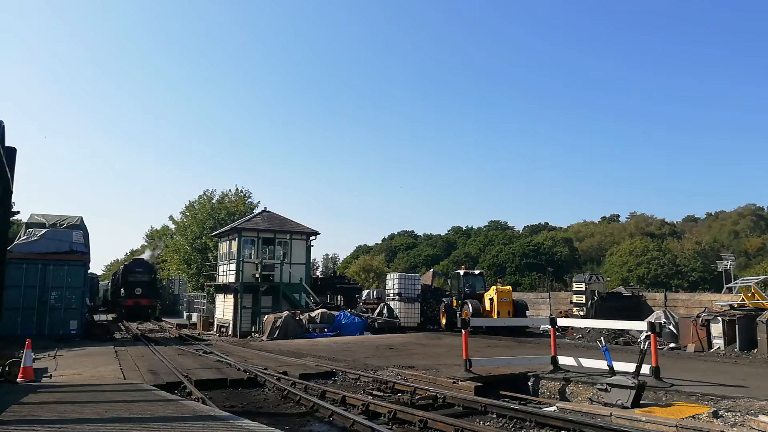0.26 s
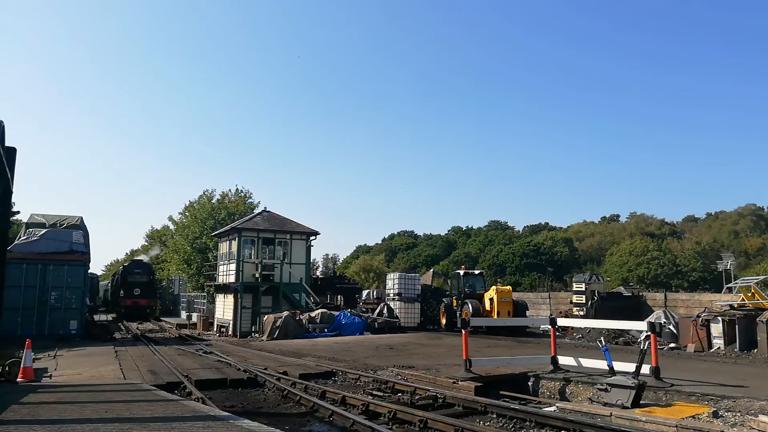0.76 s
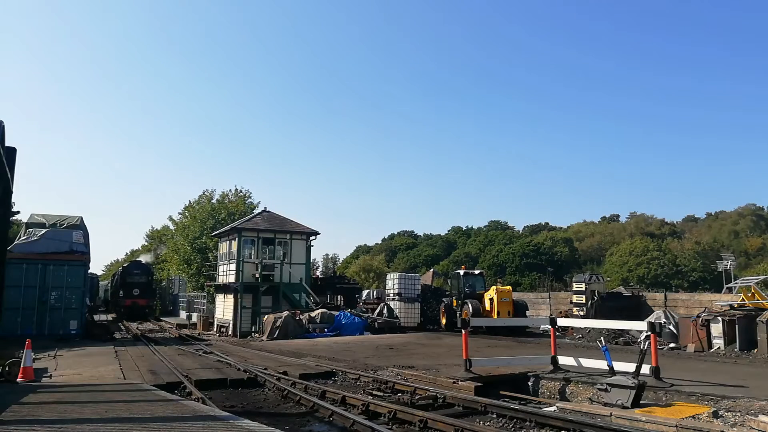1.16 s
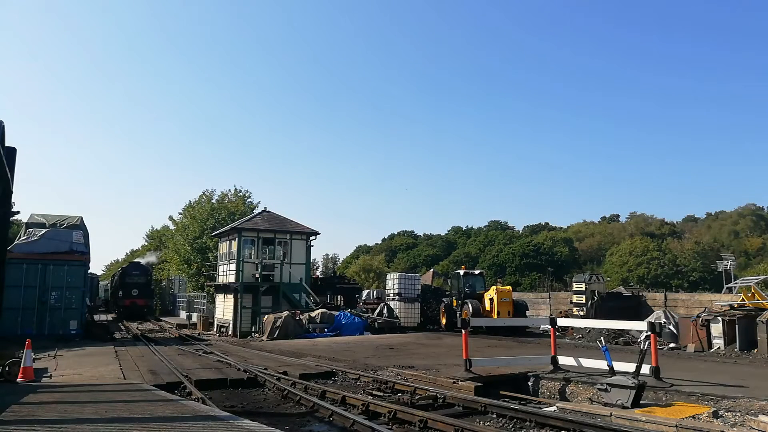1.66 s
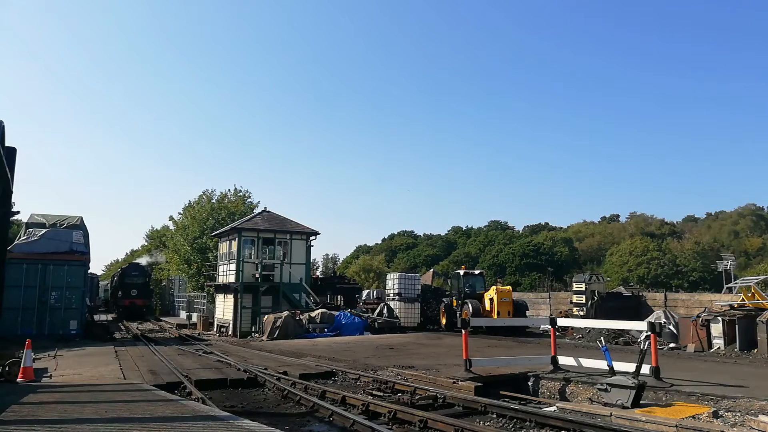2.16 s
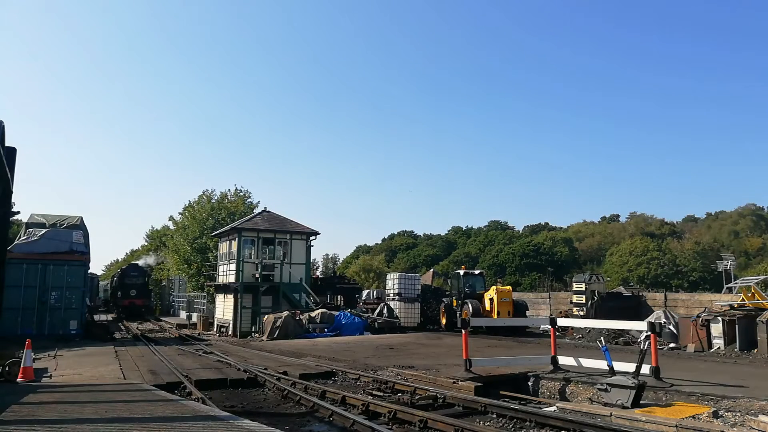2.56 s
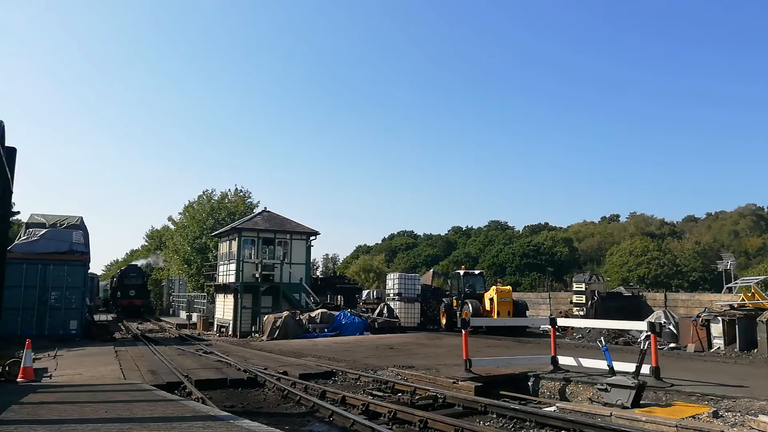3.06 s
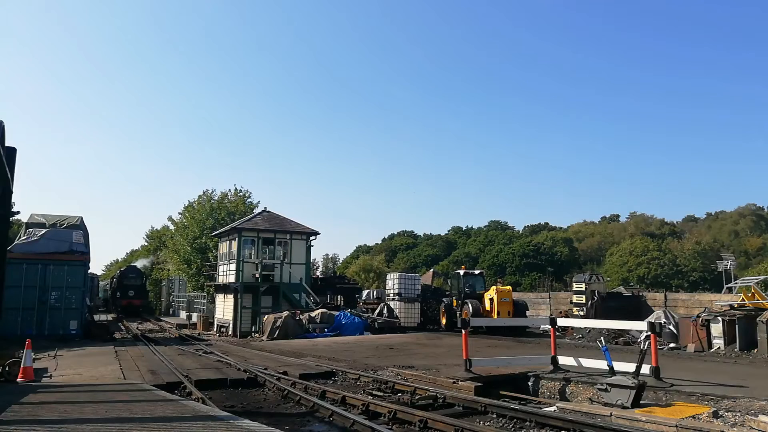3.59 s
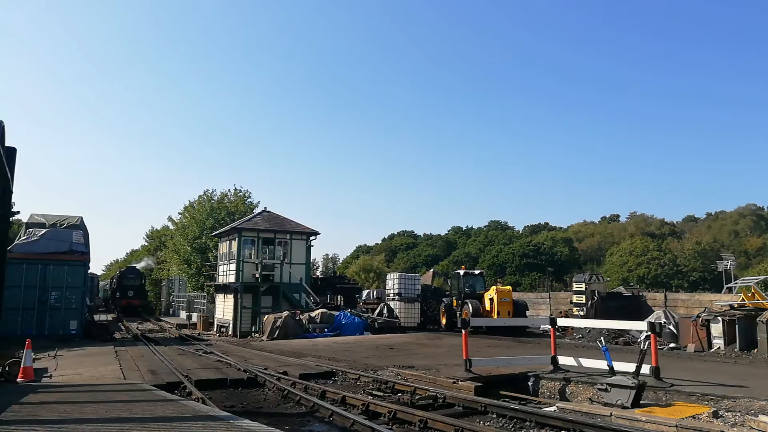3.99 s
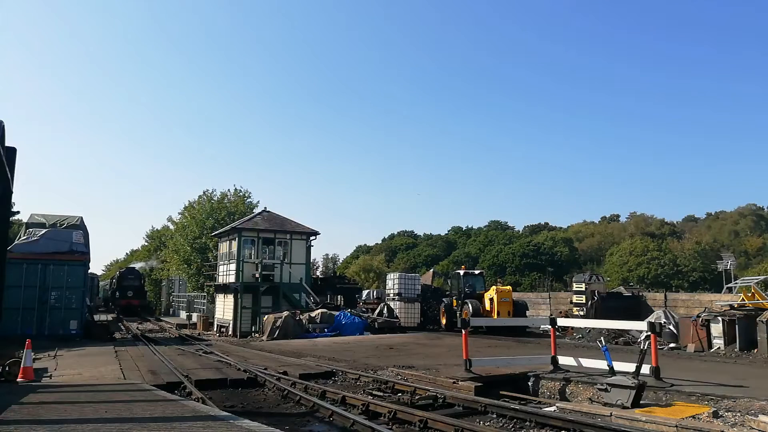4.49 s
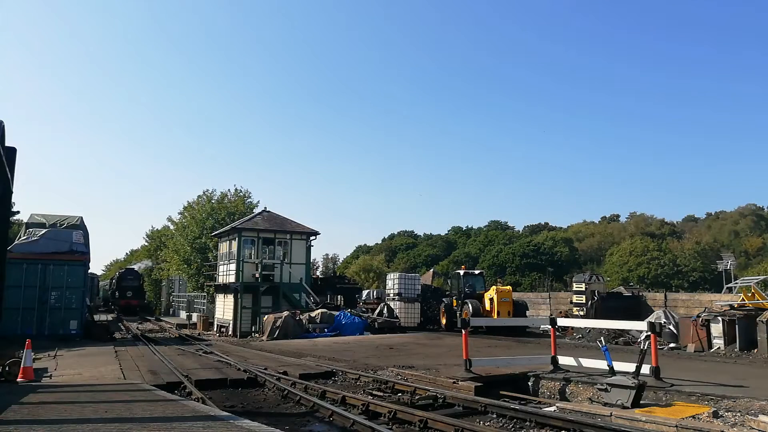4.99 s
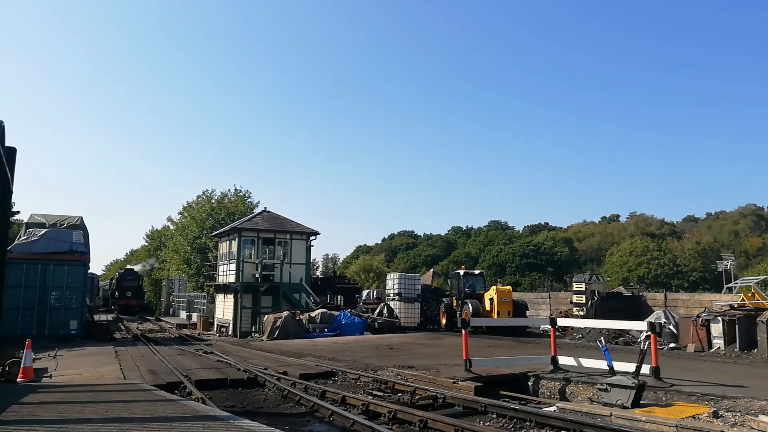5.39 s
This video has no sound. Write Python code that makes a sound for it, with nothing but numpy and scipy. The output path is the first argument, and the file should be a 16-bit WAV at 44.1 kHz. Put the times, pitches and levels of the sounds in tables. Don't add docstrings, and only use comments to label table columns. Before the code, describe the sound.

A steam engine hisses in slow, swelling puffs across an open yard while a nearby still camera snaps loudly five times.

```python
import sys
import numpy as np
from scipy import signal
from scipy.io import wavfile
from scipy.ndimage import uniform_filter1d

SR = 44100
rng = np.random.default_rng(int(sys.argv[2]) if len(sys.argv) > 2 else 0)


def digitize_waveform(pressure):
    field = np.atleast_2d(pressure).T
    bounded = np.clip(field, -1, 1)
    quanta = np.round(bounded * 32767).astype(np.int16)
    wavfile.write(sys.argv[1], SR, quanta)


def voltage_ratio(decibels):
    exponent = np.asarray(decibels, float) / 20
    return 10 ** exponent


N = 248724

# [Hz, dB]
ROAR_SPECTRUM = [(450, -37), (750, -9.5), (1000, -3.5), (1350, 1.5), (1700, -2.5), (2300, -3.5), (2800, -4),
                 (3300, -3), (4000, -32)]
# [Hz, dB]
LEAK_SPECTRUM = [(2400, -36.5), (3000, -5), (3400, -10.5), (3900, -7), (4300, -0.5), (4900, -2.5),
                 (5300, -11.5), (5700, -15), (6500, -41)]
# [Hz, dB]
DRAIN_SPECTRUM = [(2000, -16), (3000, -15), (5000, 0), (6500, 1.5), (7600, 0), (9000, -1.5), (12000, -40),
                  (13500, -30), (15500, -55)]
# [Hz, dB]
FIZZ_SPECTRUM = [(6500, -30), (7700, -5), (8500, 2.5), (9600, 1.5), (10600, -5), (11300, -9.5),
                 (12300, -21.5), (13500, -40), (15500, -55)]
# [Hz, Hz, dB, dB]
STEAM_RESONANCES = [(951.6, 89, 3.5, 11), (2316.7, 53, 8.5, 4), (3105, 94, -13.5, -4.5), (3580, 27, 2, 16),
                    (4154, 697, -2, 8.5), (4680, 570, -4, -10), (7090, 176, 2, 5), (8440, 250, 1.5, 8.5),
                    (8729, 540, -10.5, -5), (10591, 464, -14.5, 42.5)]
# [Hz, 1]
STEAM_CORRELATION = [(700, 0.38), (1200, 0.85), (2500, 0.66), (4400, 0.32), (6000, 0.49), (8500, 0.63),
                     (11000, 0.23), (14000, 0.27)]
LEFT_LEADS_S = 0.0001695

# [s, s, dB, dB, dB]
POWER_STROKES = [
    (.3, 0.5, -0.5, -1, -0.5),
    (1.53, 0.43, 1, 4.5, 0.5),
    (2.74, 0.479, -3.5, -4, 0),
    (3.88, 0.435, -1.5, 4, -1),
    (5.03, 0.5, -4, -9, -0.5),
]
# [s, s, dB, dB, dB]
RETURN_STROKES = [
    (.77, 0.35, -1, 0.5, 0),
    (1.88, 0.3777, 0.5, 2.5, 2.5),
    (3.17, .32, -3, -1, -2),
    (4.27, 0.2876, -0.5, 2, -6),
    (5.49, 0.198, -3, 1, -4.5),
]
# [s, s, dB, dB, dB]
SEEPAGE = [
    (-.1, 0.83, -3, 1, -2),
    (1.1, .25, -8, 2, -3),
    (1.3, 0.31, 2, 1, 1),
    (2.24, 0.397, -11.5, 1, -7),
    (2.5, 0.34, -8, -2, 3),
    (3.64, 0.216, -4, -0.5, 3),
    (3.8, 0.17, -2.5, 5, 3),
    (4.55, 1, -15, 2, 2.5),
]
# [dB, dB, 1, 1]
JETS_ON_POWER = [
    (-47, -1, 0.287, 0.264),
    (-42, -2, 0.24, 0.385),
    (-44.5, -0.5, 0.335, 0.43),
    (-39, 2, 0.562, 0.58),
]
# [dB, dB, 1, 1]
JETS_ON_RETURN = [
    (-55.5, 0, 0.18, 0.382),
    (-41.5, 1, 0.325, 0.495),
    (-50.5, 0.11, 0.208, 0.48),
    (-50, 0, 0.33, 0.59),
]
# [dB, dB, 1, 1]
JETS_ON_SEEPAGE = [
    (-53, 0, 0.32, 0.07),
    (-49.5, 0, 0.274, 0.089),
    (-50.5, 0, .2, 0.216),
    (-49.5, 0, 0.263, 0.49),
]
JET_REST_DB = [-66.5, -64, -72, -78]

# [Hz, dB]
YARD_SPECTRUM = [(13, -53), (22, -17), (70, 0.5), (102, -4.5), (163, -16.5), (260, -10), (462, -17.5),
                 (737, -13.5), (944, -17.5), (1980, -25), (3720, -23), (4630, -26.5), (5930, -22),
                 (9990, -19.5), (15500, -55.5)]
# [Hz, 1]
YARD_CORRELATION = [(40, .96), (125, .9), (250, .62), (380, 0), (500, -.6), (700, -.75), (950, -.4),
                    (1500, 0), (15000, 0)]
# [Hz, dB]
PORT_SPECTRUM = [(2000, -16.5), (6000, -15), (11000, -18), (13500, -15), (16000, -19)]
# [s, s, dB]
TRAFFIC_SURGES = [
    (-.2, 1.47, -47.5),
    (1.15, 0.35, -44.5),
    (2.042, 0.112, -52.5),
    (2.75, .42, -48.5),
    (4.095, 0.378, -53.5),
    (4.908, 0.165, -61),
    (5.297, 0.292, -51.5),
]
# [Hz, Hz, dB]
ENGINE_LINES = [(101.9, 5.18, -53), (186.5, 19, -59), (50.35, 3.8, -64.5), (92.5, 8, -56)]
# [s, dB, s]
WIND_PUFFS = [
    (1.264, -36, .005),
    (1.304, -29, .006),
    (1.339, -32, .004),
    (1.406, -27, .004),
    (1.475, -35, .007),
    (2.807, -34, .007),
]
# [s, s, dB]
FEED_SPELLS = [
    (-.2, 1.04, -48.5),
    (.4, 0.755, -52.5),
    (1.316, 0.88, -53),
    (2.2, 1.33, -62),
    (3.762, 0.71, -57.5),
    (4.709, 0.48, -57.5),
    (5.42, 0.21, -57),
]

# [s, dB, dB]
SHUTTER_RELEASES = [
    (0.1448, -3, 2.5),
    (1.1999, -1.5, 0),
    (2.032, -2, 0),
    (3.689, -1.5, -1),
    (5.3257, -0.21, -2),
]
# [s, dB, s, s, 0-1]
CAMERA_BLOWS = [
    (-.022, -42, .02, .05, .6),
    (0, -24, .004, .02, .55),
    (.009, -28.5, .006, .04, .7),
    (.0185, -21, .0025, .015, .35),
    (.034, -29, .003, .04, .25),
    (.0752, -20, .003, .016, .75),
    (.1256, -15.5, .0035, .014, .74),
    (.1365, -19.5, .002, .018, .65),
    (.144, -25.5, .004, .04, .5),
    (.153, -27, .006, .07, .5),
]
CLOSING_BLOW = 6
# [Hz, Hz, dB]
MIRROR_MODES = [(2080, 1030, -10.5), (3050, 1370, -7.5), (3700, 620, -3), (4330, 2020, 0.5), (6590, 390, 4)]
# [Hz, Hz, dB]
BLADE_MODES = [(7050, 884, -2.5), (9261, 1330, 2), (9980, 750, -5), (10547, 1060, -3), (12700, 1400, -28),
               (15400, 1720, -20)]
# [s, s, Hz, Hz, dB]
MOTOR_WHINES = [
    (.101, .126, 9850, 9850, -36),
    (.16, .186, 6800, 6400, -33.5),
    (.113, .126, 5900, 5900, -43),
    (.11, .126, 1960, 1960, -41),
]

# [s, s, Hz, Hz, dB]
GLAND_NOTES = [
    (.4, .35, 10300, 1400, -47),
    (0.856, .2, 4800, 300, -43),
    (1.93, .28, 4390, 400, -39),
    (2.53, 0.18, 4270, 300, -56),
    (2.82, .33, 12400, 2200, -54.5),
    (3.199, 0.25, 5110, 250, -45.5),
    (5.521, 0.18, 5070, 300, -45),
]
# [s, s, 1, Hz, dB]
WHISTLE_STROKES = [
    (1.565, .355, .53, 13140, 2),
    (3.925, .355, .55, 13190, -.5),
]
# [dB, dB, 1, 1]
EDGE_SWELL = (-42, -8, 0.49, 0.16)
# [dB, dB, 1, 1]
PIPE_SWELL = (-40.5, 1.5, -0.1, -0.05)
CLIMB_HZ, SINK_HZ, PIPE_RATIO = 850, 1090, .642
PIPE_WAITS_S, PIPE_QUITS_S = 0.071, 0.023
# [s, dB, Hz, s]
RAIL_KNOCKS = [
    (2.882, -43.5, 248, 0.108),
    (4.077, -43.5, 216, 0.132),
    (4.809, -40, 244.3, 0.0855),
]


def evened(x):
    return x / np.sqrt(np.mean(x ** 2) + 1e-20)


def read(points, hz):
    f, value = np.transpose(points)
    return np.interp(np.log(hz + 1), np.log(f + 1), value)


def add(mix, s, sound):
    part = mix[..., round(s * SR):][..., :sound.shape[-1]]
    part += sound[..., :part.shape[-1]]


def resonate(x, hz, width):
    turn = np.exp(2j * np.pi * np.cumsum(hz * np.ones(x.shape[-1])) / SR)
    r = np.exp(-np.pi * width / SR)
    smooth = signal.lfilter([1 - r], [1, -r], x / turn + 1e-18)
    return 2 * (turn * smooth).real


def swell(t, start, length, db, lean_db=0, rise=.25, fall=0.29):
    u = np.clip((t - start) / length, 0, 1)
    rising = np.sin(np.pi / 2 * np.minimum(u / abs(rise), 1))
    falling = np.sin(np.pi / 2 * np.minimum((1 - u) / abs(fall), 1))
    return (voltage_ratio(db + lean_db * (u - .5)) * rising * falling) ** 2


def hiss(colour_db, same, size, patchy_db, flicker_db, lead_s=0):
    hop = size // 4
    frames, hz = N // hop + 5, np.fft.rfftfreq(size, 1 / SR)
    a, b, c, d, patches = rng.standard_normal((frames, len(hz), 5)).T
    patches = uniform_filter1d(patches, size=6, axis=0)
    patches = evened(uniform_filter1d(patches, size=16, axis=1))
    flicker = evened(uniform_filter1d(rng.standard_normal(frames), size=3))
    same = np.clip(read(same, hz), -1, 1)[:, None]
    late = np.exp(-2j * np.pi * hz * lead_s)[:, None]
    left = a + 1j * b
    right = late * same * left + np.sqrt(1 - same ** 2) * (c + 1j * d)
    gain = voltage_ratio(colour_db(hz)[..., None] + patchy_db * patches + flicker_db * flicker)
    z = np.array([left, right]) * gain
    return evened(signal.istft(z, nperseg=size, noverlap=size - hop)[1][:, :N])


def jet_gain(jet):
    t = np.arange(0, N + 64, 64) / SR
    power = voltage_ratio(JET_REST_DB[jet]) ** 2
    strokes = ((POWER_STROKES, JETS_ON_POWER), (RETURN_STROKES, JETS_ON_RETURN), (SEEPAGE, JETS_ON_SEEPAGE))
    for rows, answers in strokes:
        level_db, *shape = answers[jet]
        for start, length, db, fizz_db, leak_db in rows:
            extra_db = (0, leak_db, 0, fizz_db)[jet]
            power = power + swell(t, start, length, level_db + db + extra_db, *shape)
    return np.interp(np.arange(N) / SR, t, np.sqrt(power))


def steam():
    out = np.zeros((2, N))
    for k, jet in enumerate((ROAR_SPECTRUM, LEAK_SPECTRUM, DRAIN_SPECTRUM, FIZZ_SPECTRUM)):
        ripple = rng.standard_normal((2, 320))

        def colour_db(hz):
            colour = read(jet, hz)
            for f, width, db, pan in STEAM_RESONANCES:
                peak = 1 / (1 + (2 * (hz - f) / width) ** 2)
                colour = colour + np.outer([db + pan / 2, db - pan / 2], peak)
            return colour + 1.3 * np.array([np.interp(hz, np.arange(len(r)) * 70, r) for r in ripple])

        sound = hiss(colour_db, STEAM_CORRELATION, size=1024, patchy_db=3.5, flicker_db=0.64, lead_s=LEFT_LEADS_S)
        out += voltage_ratio(3.5) * jet_gain(k) * sound
    return out


def distant_wash():
    wash = hiss(lambda hz: read(YARD_SPECTRUM, hz), YARD_CORRELATION, size=2048, patchy_db=4.5, flicker_db=2.1)
    ports = hiss(lambda hz: read(PORT_SPECTRUM, hz), [(0, 0), (SR, 0)], size=1024, patchy_db=1.5, flicker_db=0.73)
    return voltage_ratio(-50) * wash + voltage_ratio(-64.5) * ports


def traffic():
    common, left, right = rng.standard_normal((3, N))
    low = common + .2 * np.array([left, right])
    low = resonate(resonate(low, 60.4, 77), 53, 237)
    t = np.arange(N) / SR
    power = voltage_ratio(-52.5) ** 2 + sum(swell(t, *row) for row in TRAFFIC_SURGES)
    return np.sqrt(power) * voltage_ratio(1.0) * evened(low)


def idling_engine():
    return sum(voltage_ratio(db) * evened(resonate(rng.standard_normal(N), hz, width)) for hz, width, db in ENGINE_LINES)


def injector():
    band = resonate(resonate(rng.standard_normal((2, N)), 1884, 280), 1853, 410)
    singing = np.sqrt(sum(swell(np.arange(N) / SR, *row) for row in FEED_SPELLS))
    return voltage_ratio(np.array([[-5], [1.5]])) * singing * evened(band)


def camera(s, db, closing_db):
    t, wait = np.arange(12000) / SR, .03
    dull, bright, tick, whine = np.zeros((4, len(t)))
    for k, (after, blow_db, rattle_s, t60, share) in enumerate(CAMERA_BLOWS):
        force_db = blow_db + .6 * rng.standard_normal() + closing_db * (k == CLOSING_BLOW)
        decay_db = -60 * np.maximum(t - rattle_s, 0) / t60
        shape = voltage_ratio(force_db + decay_db) * rng.standard_normal(len(t))
        shape *= np.tanh(t / (.08 * rattle_s))
        add(tick, wait + after, shape * np.exp(-t / 0.00082))
        add(dull, wait + after, np.sqrt(1 - share) * shape)
        add(bright, wait + after, np.sqrt(share) * shape)
    out = voltage_ratio(-15) * tick
    for struck, modes in ((dull, MIRROR_MODES), (bright, BLADE_MODES)):
        for f, width, mode_db in modes:
            out = out + voltage_ratio(mode_db) * resonate(resonate(struck, f, width), f, width)
    out = signal.sosfilt(signal.butter(4, [1500, 15500], "bandpass", fs=SR, output="sos"), out)
    for start, end, start_hz, end_hz, whine_db in MOTOR_WHINES:
        hz = np.linspace(start_hz, end_hz, round((end - start) * SR))
        tone = np.sin(2 * np.pi * np.cumsum(hz) / SR) * signal.windows.tukey(len(hz), .4)
        add(whine, wait + start, voltage_ratio(whine_db) * tone)
    return s - wait, voltage_ratio(db) * (1.95 * out + whine)


def nearby(x):
    t = np.arange(4000) / SR
    signs = rng.choice([-1., 1.], (2, len(t)))
    sparse = rng.random((2, len(t))) < .05
    taps = signs * sparse * (t > .002) * voltage_ratio(-60 * t / 0.12)
    taps *= voltage_ratio(-13) / np.linalg.norm(taps, axis=1, keepdims=True)
    taps[1, 0], taps[0, 30] = 1, voltage_ratio(-12)
    return signal.oaconvolve(x[None], taps, axes=1)[:, :N]


def gland(start, length, hz, width, db):
    t = np.arange(0, length, 1 / SR)
    common, left, right = rng.standard_normal((3, len(t)))
    air = 0.65 * common + np.array([left, right])
    note = evened(resonate(resonate(air, hz, width), hz, 1.5 * width))
    return start, np.sqrt(swell(t, 0, length, db, rise=0.48, fall=.35)) * note


def wind_puff(s, db, half):
    u = (np.arange(4000) / SR - .03) / half
    return s - .03, -voltage_ratio(db) * (1 - 1.4 * u ** 2) * np.exp(-u ** 2) * np.ones((2, 1))


def whistle(start, length, top, top_hz, pipe_db):
    t = np.arange(0, length, 1 / SR)
    u = t / length - top
    bend = np.where(u < 0, CLIMB_HZ / top ** 2, SINK_HZ / (1 - top) ** 2)
    edge_hz = top_hz - bend * u ** 2
    pipe_hz = PIPE_RATIO * np.where(u < 0, (edge_hz + top_hz) / 2, edge_hz)
    edge_gain = np.sqrt(swell(t, 0, length, *EDGE_SWELL))
    pipe_gain = np.sqrt(swell(t, PIPE_WAITS_S, length - PIPE_WAITS_S - PIPE_QUITS_S, *PIPE_SWELL))
    common, left, right = rng.standard_normal((3, len(t)))
    late = np.roll(common, round(LEFT_LEADS_S * SR))
    air = 0.51 * np.array([common, late]) + 0.84 * np.array([left, right])
    edge = evened(resonate(resonate(air, edge_hz, 70), edge_hz, 220))
    skirt_hz = edge_hz - 650
    skirt = resonate(resonate(air, skirt_hz, 1100), skirt_hz, 1100)
    edge += .6 * evened(resonate(skirt, skirt_hz, 1400))
    pipe = evened(resonate(resonate(air, pipe_hz, 110), pipe_hz, 260))
    return start, voltage_ratio(np.array([[4.5], [0.3]])) * edge_gain * edge + voltage_ratio(2.0 + pipe_db) * pipe_gain * pipe


def rail_joint(s, db, hz, t60):
    t = np.arange(12000) / SR
    ring = np.sin(2 * np.pi * hz * t) + 0.55 * np.sin(2 * np.pi * 1.6 * hz * t)
    return s, voltage_ratio(db + 1.0 - 60 * t / t60) * np.tanh(t / 0.0051) * ring * np.ones((2, 1))


def scene():
    out = steam() + distant_wash() + traffic() + idling_engine() + injector()
    clicks = np.zeros(N)
    for row in SHUTTER_RELEASES:
        add(clicks, *camera(*row))
    out += nearby(clicks)
    for source, rows in ((gland, GLAND_NOTES), (wind_puff, WIND_PUFFS), (whistle, WHISTLE_STROKES),
                         (rail_joint, RAIL_KNOCKS)):
        for row in rows:
            add(out, *source(*row))
    return out


def top_cut(x):
    return signal.sosfilt(signal.butter(12, 15830, fs=SR, output="sos"), x)


def record(dry):
    return top_cut(dry)


dry = scene()
out = record(dry)
digitize_waveform(out)
```